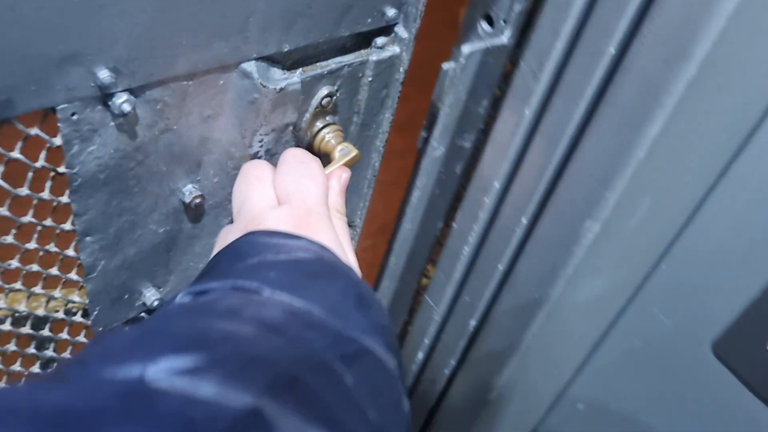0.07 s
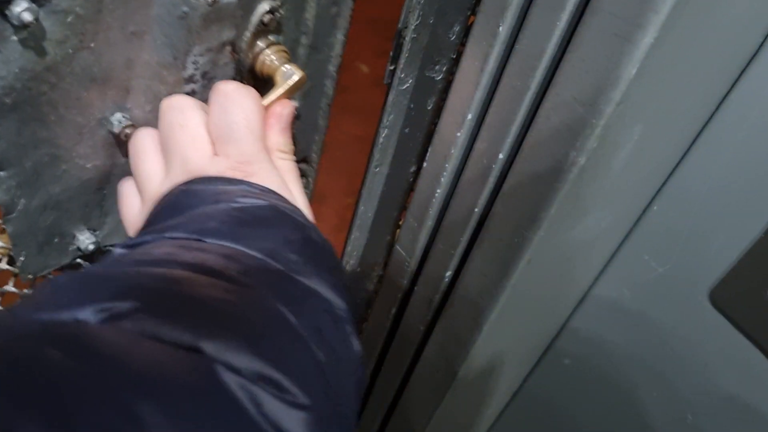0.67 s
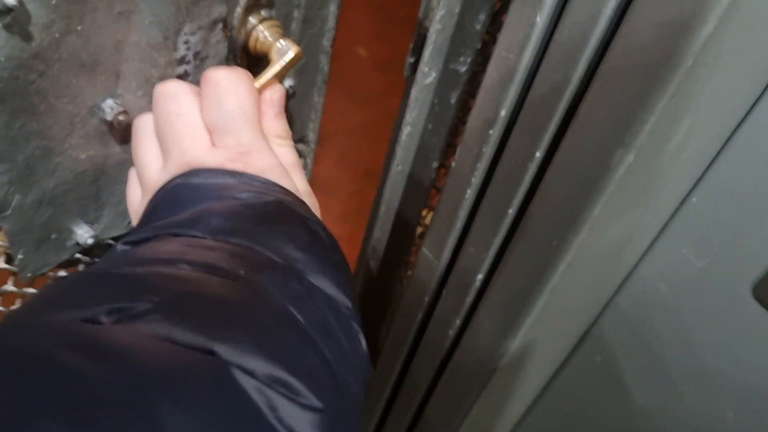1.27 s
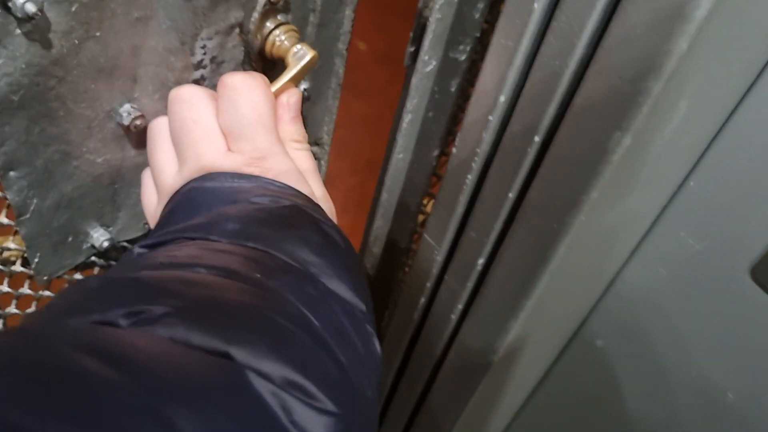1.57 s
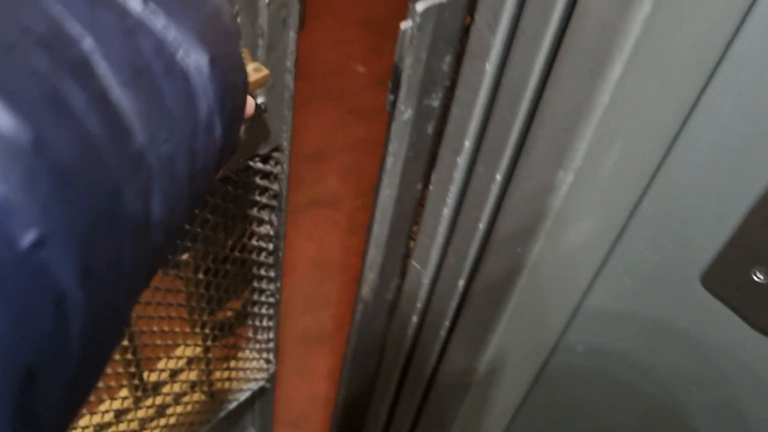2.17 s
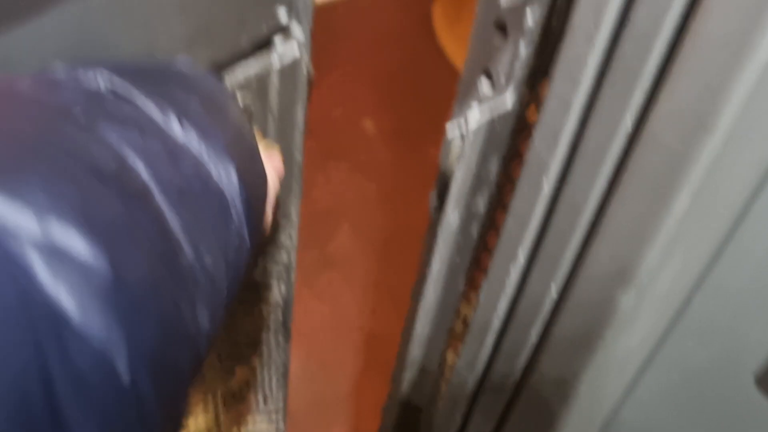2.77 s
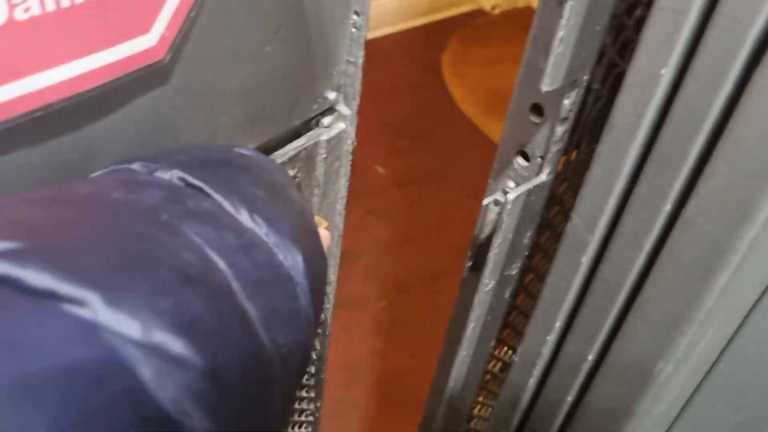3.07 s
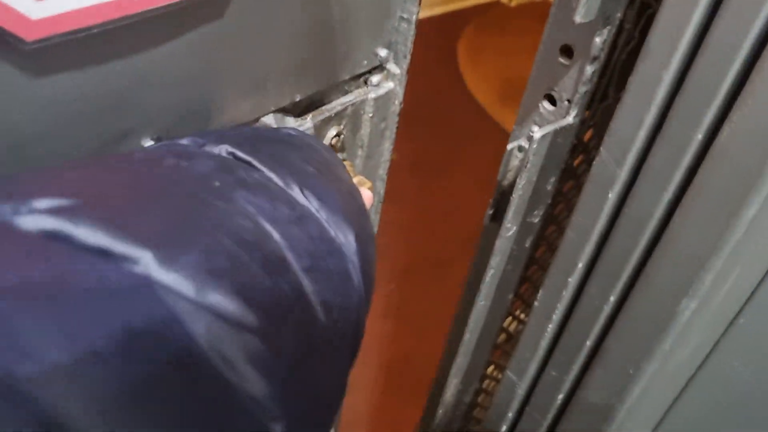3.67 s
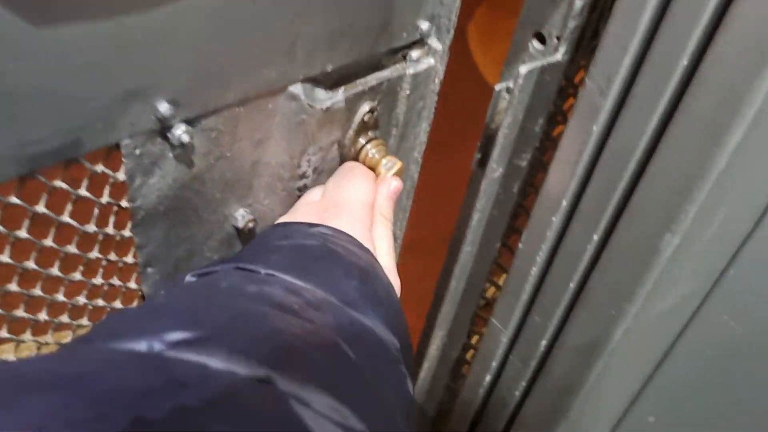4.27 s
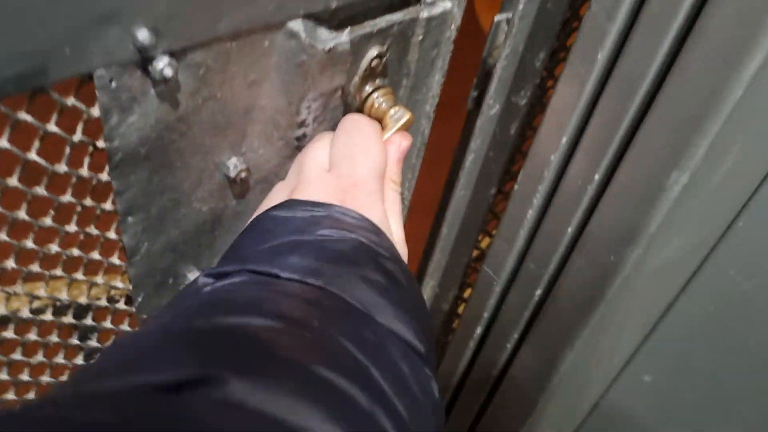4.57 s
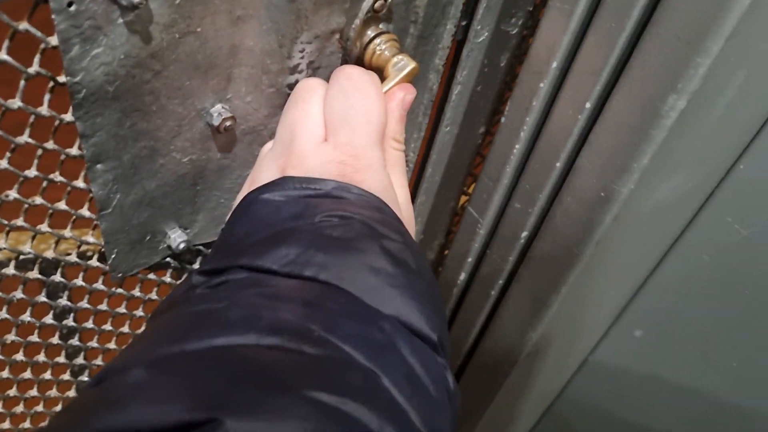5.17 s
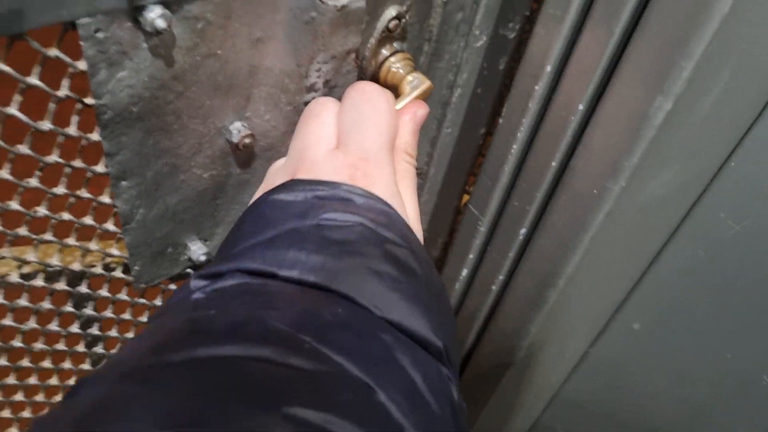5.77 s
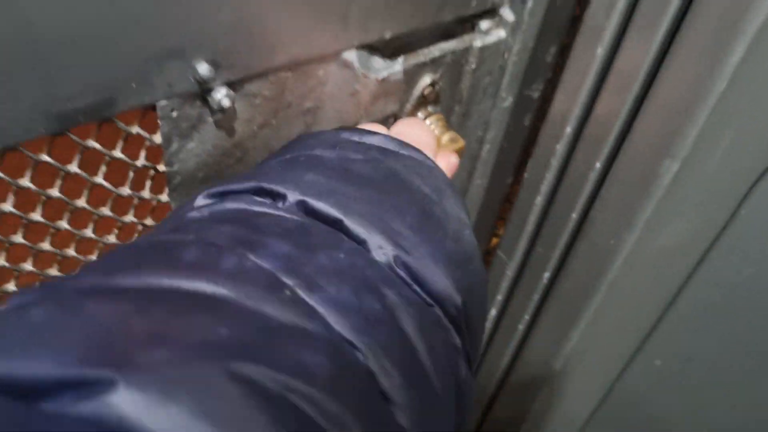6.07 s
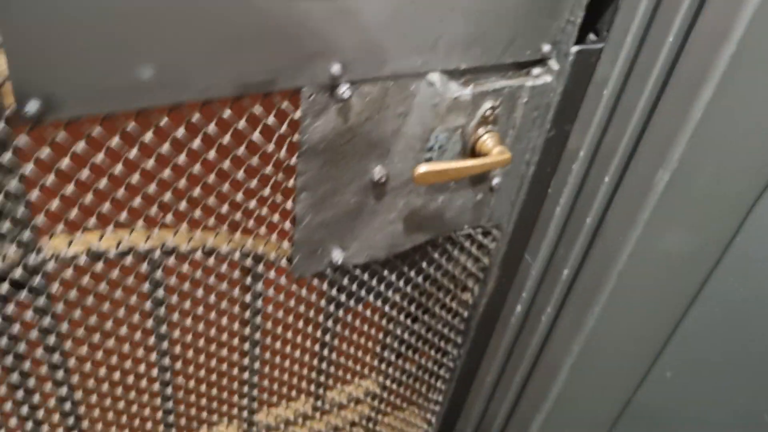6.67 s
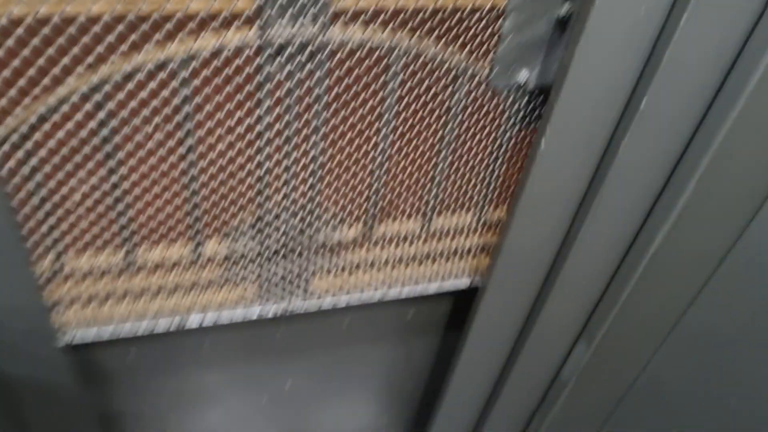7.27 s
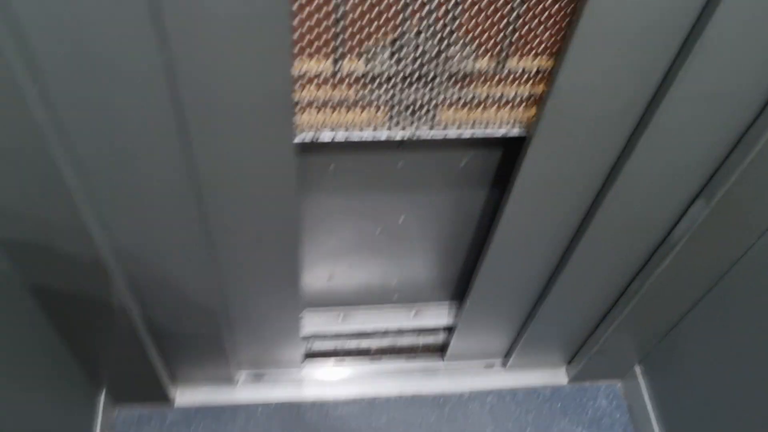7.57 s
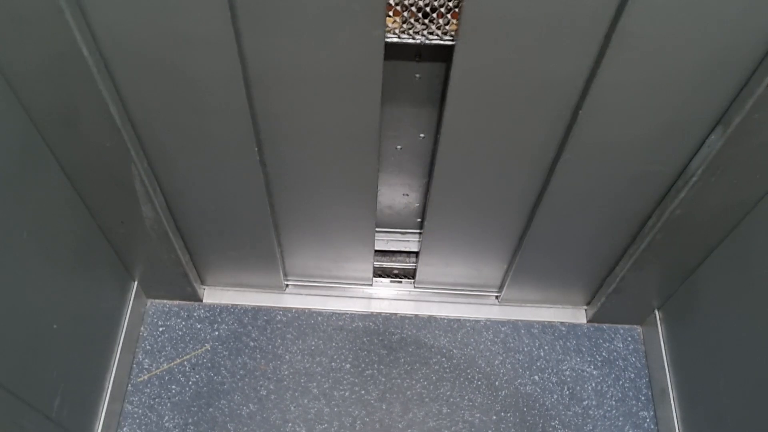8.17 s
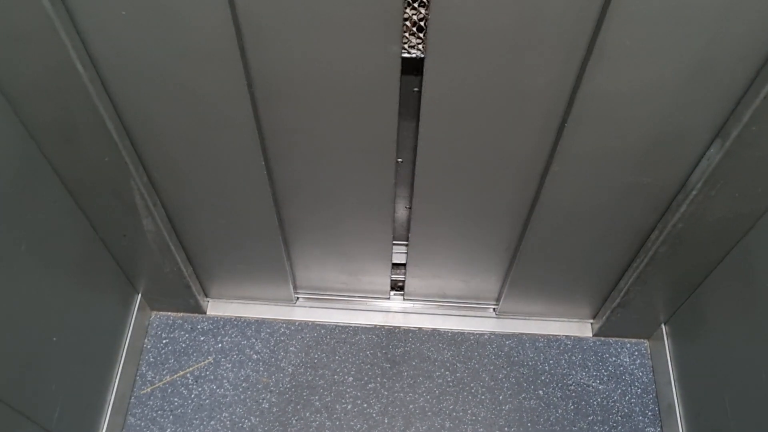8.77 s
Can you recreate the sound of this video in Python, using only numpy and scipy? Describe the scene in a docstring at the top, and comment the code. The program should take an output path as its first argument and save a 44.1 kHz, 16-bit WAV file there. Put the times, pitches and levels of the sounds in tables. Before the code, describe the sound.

A metal gate bangs shut at close range in a cramped elevator cabin, ringing briefly and leaving a deep shudder. Light handle clicks, very faint squeaks and soft jacket rustling follow over a thin electronic whine. A second clunk latches the gate, with more clicks and a louder sleeve swish. Finally the sliding doors roll closed with a padded knock, a low rumble and some scraping.

```python
"""Inside a small old lift, electronics whine faintly. The steel mesh gate slides, slams and sways.
Its brass handle is worked with clicks and thin squeaks, then the gate is pulled into its latch.
A nylon sleeve rustles, and last the cabin's sliding doors rumble shut on their rollers.
The cabin gives each metal blow a short bright ring, the stairwell a long dull tail."""
import sys
import numpy as np
from scipy import signal
from scipy.fft import rfft, irfft, next_fast_len
from scipy.io import wavfile
from scipy.ndimage import uniform_filter1d

SR = 44100
rng = np.random.default_rng(int(sys.argv[2]) if len(sys.argv) > 2 else 0)


def wrap_up_sound(samples):
    """Save the sound to the file named by the first command line argument, as 16-bit audio."""
    columns = np.atleast_2d(samples).T
    # keep every value between -1 and 1, then stretch to whole-number steps
    tamed = np.clip(columns, -1, 1)
    steps = np.round(tamed * 32767).astype(np.int16)
    wavfile.write(sys.argv[1], SR, steps)


N = 389403
TIME = np.arange(N) / SR

# tone colour of small metal parts (handle, door rollers): pitch_hz, level_db
SMALL_METAL_SPECTRUM = [(60, -41), (250, -20.5), (500, -8.5), (1100, 1), (2200, 1.5), (3300, 5), (6000, 4),
                        (10000, -7), (15500, -6.5)]
# notes those parts ring with: pitch_hz, level_db, fade_s
SMALL_METAL_NOTES = [(618.5, -4, 0.095), (1108, -6, 0.13), (1427, -5.5, 0.074), (1670, -18, 0.1),
                     (2030, -6, 0.036), (2391, -9, 0.031), (3124, -9, 0.022), (3820, -19, 0.026),
                     (4750, -2.5, 0.035)]
# tone colour of the door panels: pitch_hz, level_db
PANEL_SPECTRUM = [(76, -44), (130, 3.5), (146, -19.5), (162, 4), (177, 3.5), (249, -2.5), (269, -7),
                  (301, 1), (398, -2.5), (482, -10), (700, -11), (910, -24), (1540, -120)]


def undb(db):
    """Turn decibels into a gain."""
    return 10 ** (np.asarray(db) / 20)


def unit(x):
    """Scale a signal to an average strength (rms) of 1."""
    return x / np.sqrt(np.mean(x ** 2))


def pan(left_db):
    """Gains for the two channels, the left one louder by left_db."""
    return undb(np.array([[left_db], [-left_db]]) / 2)


def read(points, hz):
    """Look up a value between (pitch_hz, value) points, with octaves evenly spaced."""
    pitches, values = np.transpose(points)
    return np.interp(np.log(np.maximum(hz, 1)), np.log(pitches), values)


def colour(x, points, size=8192):
    """Filter a sound so that it follows (pitch_hz, level_db) points."""
    gains = undb(read(points, np.fft.rfftfreq(size, 1 / SR)))
    cepstrum = irfft(np.log(gains))
    # folding this in half keeps the filter from sounding before its input
    cepstrum[1:size // 2] *= 2
    cepstrum[size // 2 + 1:] = 0
    response = irfft(np.exp(rfft(cepstrum)))
    return signal.fftconvolve(np.atleast_2d(x), response[None], axes=1)[:, :x.shape[-1]]


def diffuse(n, spacing_m=.3):
    """Noise from all sides: left and right are alike in the bass, unrelated in the treble."""
    size = next_fast_len(n, True)
    mid, side = rfft(rng.standard_normal((2, size)))
    alike = np.sinc(2 * np.fft.rfftfreq(size, 1 / SR) * spacing_m / 343)  # sound travels 343 m/s
    mid, side = mid * np.sqrt(1 + alike), side * np.sqrt(1 - alike)
    return unit(irfft([mid + side, mid - side], size)[:, :n])


def wander(rate_hz):
    """A random curve of size about 1 that heads for a new value rate_hz times a second."""
    step = int(SR / rate_hz)
    stairs = np.repeat(rng.standard_normal(N // step + 1), step)
    return unit(uniform_filter1d(stairs, step)[:N])


def fade(t, fade_s):
    """Die away by 60 dB every fade_s seconds."""
    return np.exp(-np.log(1000) * t / np.maximum(fade_s, 1e-3))


def swell(peak_s, hold_s, rise_s, fall_s):
    """Grow until peak_s, hold, then fall; rise_s and fall_s are the times for a tenfold change."""
    early, late = np.maximum(peak_s - TIME, 0), np.maximum(TIME - peak_s - hold_s, 0)
    return 10 ** -np.minimum(early / max(rise_s, 1e-3) + late / max(fall_s, 1e-3), 10)


def ring(notes, t):
    """A struck object rings with several fading notes at once."""
    return sum(undb(db) * fade(t, fade_s) * np.sin(2 * np.pi * hz * t) for hz, db, fade_s in notes)


def add(out, start_s, x):
    """Mix a sound in at start_s."""
    i = max(int(start_s * SR), 0)
    out[:, i:i + x.shape[-1]] += x[..., :N - i]


def tone(hz, waver_db, drift_rad):
    """A held note that wavers in level and phase, differently left and right."""
    phase = 2 * np.pi * hz * TIME + drift_rad * np.array([wander(10), wander(6.1)])
    return unit(np.sin(phase) * undb(waver_db * np.array([wander(1.4), wander(13.0)])))


def rough_noise(spectrum, rough_db, rate_hz):
    """Noise whose strength changes from moment to moment, as in rubbing."""
    return unit(colour(diffuse(N) * undb(rough_db * wander(rate_hz)), spectrum))


def metal_hits(hits, spectrum, notes, ring_db, focus_db, left_lag_ms, rough_db, rise_s):
    """Metal on metal: a chatter of tiny bounces makes a crack and sets the part ringing."""
    out, t = np.zeros((2, N)), TIME[:SR // 3]
    response = ring(notes, t)
    response /= np.linalg.norm(response)
    for start_s, db, treble_db, ring_hz, chatter_s, left_db in hits:
        bounces = undb(rough_db * np.repeat(rng.standard_normal(len(t)), SR // 900)[:len(t)])
        force = rng.standard_normal(len(t)) * bounces * fade(t, chatter_s) * (1 - np.exp(-t / rise_s))
        crack = unit(colour(force, spectrum, size=2048))
        ringing = unit(signal.fftconvolve(force, response)[:len(t)])
        hit = crack + undb(ring_db) * ringing
        # the spot that is struck favours one pitch
        hit = colour(hit, [(ring_hz / 1.4, 0), (ring_hz, focus_db), (ring_hz * 1.1, 0)], size=1024)
        # a soft hit has less treble
        top_db = min(treble_db, 0.73 * treble_db)
        hit = colour(hit, [(2500, 0.0017), (7000, treble_db), (13000, top_db)], size=256)[0]
        hit *= undb(db) / hit[:SR // 200].std()  # the first 5 ms set the level
        add(out[:1], start_s + left_lag_ms / 1000, hit * undb(left_db / 2))
        add(out[1:], start_s, hit * undb(-left_db / 2))
    return out


def background(air_db=-59, whine_hz=15687, whine_db=-61):
    """Still air of the building, a faint hum and a thin electronic whine."""
    # tone colour of the air: pitch_hz, level_db
    air_spectrum = [(13, -46), (22, -17), (37, -8.5), (60, 0), (127, -17), (271, -13.5), (302, -7.5),
                    (328, -20.5), (355, -14), (418, -16), (821, -21.5), (1610, -30), (5150, -34),
                    (11000, -43), (14000, -40)]
    # notes of the hum: pitch_hz, level_db
    hum_notes = [(299.5, -72), (400, -79.5)]
    air = undb(air_db) * rough_noise(air_spectrum, rough_db=3.0, rate_hz=5)
    hum = sum(undb(db) * tone(hz, waver_db=-0.5, drift_rad=2.0) for hz, db in hum_notes)
    return air + hum + undb(whine_db) * tone(whine_hz, waver_db=1.0, drift_rad=1.0)


def stairwell(x, build_s=0.02):
    """The stone shaft behind the mesh echoes for a long time, the treble dying first."""
    # how long the echo lasts: pitch_hz, fade_s
    echo_times = [(100, 2.42), (400, 2.22), (1300, 1.88), (2800, 1.61), (5500, 1.04), (9000, 0.68),
                  (11500, 0.66), (15000, 0.57)]
    t = TIME[:2 * SR + SR // 2]
    hz, times, bands = signal.stft(diffuse(len(t)), SR, nperseg=256)
    bands = bands * fade(times, read(echo_times, hz)[:, None])
    tail = signal.istft(bands, SR)[1][:, :len(t)]
    tail *= 1 - np.exp(-t / build_s)
    tail /= np.linalg.norm(tail[0])
    from_left = signal.fftconvolve(x[:1], tail, axes=1)
    from_right = signal.fftconvolve(x[1:], tail[::-1], axes=1)
    return (from_left + from_right)[:, :N] / 2


def cabin(x, echo_db, fade_s):
    """Close steel walls add a crowd of echoes, starting 2 ms after the sound."""
    t = TIME[:SR // 2]
    echoes = diffuse(len(t)) * fade(t, fade_s) * (t > .002)
    echoes /= np.linalg.norm(echoes[0])
    return x + undb(echo_db) * signal.fftconvolve(x, echoes, axes=1)[:, :N]


def handle_squeaks(spread_hz=130, rate_hz=200):
    """The handle's dry brass shaft sticks and slips, making thin, unsteady squeaks."""
    # squeaks under the hand: peak_s, level_db, pitch_hz
    squeaks = [(1.36, -70, 7700), (1.38, -72.5, 5000), (1.6, -67.5, 8950), (1.62, -67.5, 5050),
               (4.45, -68, 5300)]
    wobble_hz = spread_hz * np.array([wander(rate_hz), wander(rate_hz)])
    slip = 2 * np.pi * np.cumsum(wobble_hz, axis=1) / SR
    out = np.zeros((2, N))
    for peak_s, db, hz in squeaks:
        strength = undb(db) * swell(peak_s, hold_s=0.028, rise_s=0.063, fall_s=0.13)
        out += strength * np.sin(2 * np.pi * hz * TIME + slip)
    return out


def gate_guide():
    """The moving gate rubs softly along its guide rail."""
    # moves of the gate: peak_s, hold_s, level_db
    slides = [(0.031, 0.076, -47), (1.57, .12, -59), (2.796, 0.43, -64), (4.453, 0.82, -65)]
    # tone colour of the rail: pitch_hz, level_db
    rail_spectrum = [(200, -21), (500, -9.5), (720, -7), (820, 3), (930, -14.5), (1600, -19.5),
                     (3000, -16.5), (8000, -36)]
    effort = sum(undb(db) * swell(s, hold_s, rise_s=0.22, fall_s=.12) for s, hold_s, db in slides)
    return effort * rough_noise(rail_spectrum, rough_db=0.3, rate_hz=30)


def sleeve():
    """Nylon brushes against itself and the gate in many tiny slips."""
    # strokes of the sleeve: peak_s, hold_s, level_db, rise_s, fall_s
    strokes = [(0.069, 0.046, -45.5, 0.39, 0.046), (1.583, 0.045, -63.5, 0.075, 0.44),
               (2.104, 0, -46, 0.049, 0.22), (3.25, 0.025, -58, 0.17, 0.092),
               (4.527, 0.21, -65.5, 0.28, 0.18), (6.098, 0.061, -34.5, 0.097, 0.064),
               (6.254, 0.45, -52.5, 0.069, 0.12), (6.817, 0, -39, 0.012, 0.072),
               (6.877, 0.64, -47.5, 0.19, 0.33), (7.093, 0.041, -46.5, .004, 0.085),
               (7.67, 0.042, -44, 0.092, 0.12), (7.99, 0.13, -58, 0.22, 0.54)]
    # tone colour of nylon: pitch_hz, level_db
    nylon_spectrum = [(150, -25.5), (500, 2), (1200, 0), (1900, -1.5), (3000, 0), (5300, -2.5), (10000, -6),
                      (15500, -10)]
    effort = sum(undb(db) * swell(s, hold, rise, fall) for s, hold, db, rise, fall in strokes)
    return rough_noise(nylon_spectrum, rough_db=1.0, rate_hz=67) * effort * pan(left_db=-1)


def door_knock(rise_s=0.0032, thud_db=-5, thud_s=0.072):
    """A padded knock of the door drive rings and shakes the panels."""
    # the knock: start_s, level_db
    knocks = [(7.015, -23)]
    # notes of the door: pitch_hz, level_db, fade_s
    door_notes = [(70.8, 9.5, 0.29), (173.3, 4, 0.2), (254, -16, 0.46), (119, -6, 0.096), (300, -39, 0.14)]
    out, t = np.zeros((2, N)), TIME[:SR]
    push = 1 - np.exp(-t / rise_s)
    for start_s, db in knocks:
        thud = undb(thud_db) * unit(colour(diffuse(len(t)), PANEL_SPECTRUM)) * fade(t, thud_s)
        add(out, start_s, undb(db) * push * (ring(door_notes, t) + thud))
    return out


def roller_rattles(gain_db=-9):
    """The rollers and hangers that carry the doors rattle."""
    # rattles: start_s, level_db (before gain_db), treble_db, ring_hz, chatter_s, left_db
    rattles = [(6.481, -49, -27, 1100, .1, -12), (6.819, -28.5, 17, 5470, 0.066, -3),
               (7.097, -42, 15, 5000, 0.098, -11), (7.290, -32.5, -27, 1150, 0.04, -5),
               (7.420, -39.5, -27, 1400, 0.068, -2), (7.651, -30.5, -5.5, 1100, 0.22, -2),
               (7.690, -33.5, -1, 1040, 0.11, -3), (7.836, -42, -25.5, 1350, 0.031, -7),
               (7.876, -55, -10.5, 1400, 0.11, 6), (8.214, -47.5, -20, 1100, .05, 0),
               (8.266, -53, -20, 1150, 0.11, -14)]
    return undb(gain_db) * metal_hits(rattles, SMALL_METAL_SPECTRUM, SMALL_METAL_NOTES, ring_db=-9.5,
                                      focus_db=8, left_lag_ms=.25, rough_db=1.5, rise_s=0.0016)


def sliding_doors():
    """The doors speed up, run and brake; they shake the cabin, drone and scrape along the sill."""
    # gate and doors shudder in their frames: peak_s, hold_s, rumble_db, drone_db
    shudders = [(5.43, 0.042, -33.5, -38), (5.568, 0.07, -34.5, -55), (5.9, 0.099, -34.5, -60),
                (6.017, .01, -28, -36), (6.13, 0.58, -40, -49), (6.513, 0.064, -33.5, -40.5),
                (6.824, 0.023, -30.5, -37.5), (7.126, 0.036, -35, -43), (8.237, 0.1, -42, -45.5),
                (8.551, .04, -46.5, -45.5), (8.658, 0.12, -38, -61)]
    # metal catches on the sill: peak_s, level_db
    catches = [(5.435, -40.5), (6.479, -40.5), (7.293, -41.5), (7.42, -48), (7.686, -40), (7.88, -44.5),
               (8.28, -46)]
    # tone colour of the shaking cabin: pitch_hz, level_db
    rumble_spectrum = [(13, -47), (22, -31), (39, -6.5), (65, 4.5), (83, -2), (113, -19.5), (140, -27),
                       (180, -14), (310, -120)]
    # tone colour of the door track: pitch_hz, level_db
    track_spectrum = [(200, -36.5), (550, 6), (800, 10.5), (950, 6), (1100, 6), (1230, -4), (1380, -6.5),
                      (1650, -4), (2700, -5), (3600, -16), (6000, -39), (14000, -47)]
    speed = swell(peak_s=7.415, hold_s=0.33, rise_s=0.98, fall_s=1.14)
    shake = undb(-28.5) * speed
    drone = undb(-45.5) * speed ** 0.85
    scrape = undb(-48.5) * speed ** 0.93
    for peak_s, hold_s, rumble_db, drone_db in shudders:
        shudder = swell(peak_s, hold_s, rise_s=0.044, fall_s=0.12)
        shake = np.hypot(shake, undb(rumble_db) * shudder)  # noises add by their power
        drone = np.hypot(drone, undb(drone_db) * shudder)
    for peak_s, db in catches:
        scrape = np.hypot(scrape, undb(db) * swell(peak_s, hold_s=0.0027, rise_s=.03, fall_s=0.068))
    rumble = colour(diffuse(N), rumble_spectrum)
    rumble /= np.sqrt(uniform_filter1d(rumble[0] ** 2, size=SR // 12))  # the rolling load is steady
    panels = drone * rough_noise(PANEL_SPECTRUM, rough_db=2, rate_hz=40)
    track = scrape * rough_noise(track_spectrum, rough_db=1.5, rate_hz=69)
    return shake * rumble + (panels + track) * pan(left_db=1.5)


def handle_clicks():
    """The brass handle and its bolt click as they are worked."""
    # clicks: start_s, level_db, treble_db, ring_hz, chatter_s, left_db
    clicks = [(1.003, -47, -14, 2394, 0.016, -2.5), (1.865, -39, -5.5, 4380, 0.051, -4.5),
              (1.93, -32.5, 2, 1195, 0.024, -13), (1.941, -33, -8, 3180, 0.043, 7.5),
              (2.161, -32, -5.5, 1123, 0.014, -8.5), (2.169, -37.5, -13, 1150, 0.024, 7),
              (3.255, -40, -6.5, 3414, 0.034, -10.5), (3.897, -36, -7.5, 3300, 0.041, -8),
              (3.980, -43, -3.5, 1350, 0.031, -4.5), (4.103, -58, -5, 1298, 0.056, -7),
              (4.808, -55.5, -14, 1248, 0.018, -2.5), (5.220, -50.5, -1.5, 1630, 0.15, -2.5),
              (5.425, -50.5, -15.5, 6220, 0.018, -15), (5.861, -32, 0.5, 11900, 0.018, -7.5),
              (5.95, -35.5, -20, 3220, 0.013, -7), (6.217, -32, -9, 2900, 0.042, -4.5),
              (6.337, -29, -4, 3100, 0.019, 1.5), (6.346, -25.5, -5, 1340, 0.023, -4),
              (6.406, -38, -1, 2823, 0.026, -3)]
    return metal_hits(clicks, SMALL_METAL_SPECTRUM, SMALL_METAL_NOTES, ring_db=-13,
                      focus_db=5, left_lag_ms=-.1, rough_db=4, rise_s=0.0011)


def gate_body(frame_db=-10, thud_db=-1, thud_s=0.43, sway_db=2, rise_s=0.002, sway_rise_s=.007):
    """The frame booms, and the whole gate sways on low notes so close together that they throb."""
    # the gate's weight arrives and rocks: start_s, level_db, extra_sway_db
    thumps = [(.266, -11, -1.5), (0.554, -28, -26), (.657, -32.5, -21), (1.072, -53, 10),
              (1.929, -59.5, 0.5), (2.165, -53.5, -5), (5.391, -45.5, 2), (5.701, -21, -4),
              (6.013, -32, -15)]
    # tone colour of the thud: pitch_hz, level_db
    thud_spectrum = [(25, -7), (55, 1), (105, -10), (135, -16), (180, -3), (350, -8.5), (550, -15.5),
                     (900, -18), (2500, -48.5)]
    # notes of the frame: pitch_hz, level_db, fade_s
    frame_notes = [(164.7, -3.5, 1.2), (179.9, 4.5, 0.82), (203.2, -11.5, 2.2), (213, -9, 1.1),
                   (235.2, -3, 0.73), (276, -13.5, 0.91), (329.6, -10, 1.1), (360, 2.5, 0.3),
                   (423, -19.5, 1.3), (477.5, -16, 1)]
    # notes of the swaying gate: pitch_hz, level_db, fade_s
    sway_notes = [(53.7, -4, 1.5), (57.3, -1, 2.1), (69.2, -5.5, 1.7), (52.5, 0.5, 1.2)]
    frame, sway, t = np.zeros((2, N)), np.zeros((2, N)), TIME[:3 * SR]
    push = 1 - np.exp(-t / rise_s)
    boom = undb(frame_db) * ring(frame_notes, t)
    throb = (1 - np.exp(-t / sway_rise_s)) * ring(sway_notes, t)
    for start_s, db, extra_sway_db in thumps:
        thud = undb(thud_db) * unit(colour(diffuse(len(t)), thud_spectrum)) * fade(t, thud_s)
        add(frame, start_s, undb(db) * push * (boom + thud))
        add(sway, start_s, undb(db + sway_db + extra_sway_db) * throb)
    return frame, sway


def gate_clacks():
    """The steel gate strikes its frame and lock."""
    # blows: start_s, level_db, treble_db, ring_hz, chatter_s, left_db
    clacks = [(.203, -36.5, 4, 1580, 0.21, -7.5), (.234, -20, -8, 1310, 0.029, 11),
              (.240, -14.5, -3.5, 1310, 0.016, -10.5), (.249, -22, -6, 6060, 0.054, 23),
              (.2595, -14, -1.5, 6400, 0.047, -9), (.270, -24.5, 4, 1309, 0.051, 3),
              (5.344, -50, -17, 1600, .1, 5), (5.375, -41.5, -25, 1490, 0.024, -5),
              (5.418, -34, -35, 1390, 0.033, 1.5), (5.458, -58, -33, 810, 0.068, 0),
              (5.661, -28.5, -24.5, 1390, 0.021, -5.5), (5.693, -20.5, -2.5, 1420, 0.021, -7.5),
              (5.775, -36.5, -14, 1360, .03, -5), (5.807, -37.5, -6, 1410, .03, -7),
              (6.007, -35, -21, 1320, 0.028, -3)]
    # tone colour of the steel: pitch_hz, level_db
    steel_spectrum = [(60, -40), (200, -19), (400, -10), (750, -8), (1300, -0.5), (1800, -7.5), (3000, -9),
                      (4200, -14), (6200, -8.5), (9500, -11), (15500, -22)]
    # notes of the lock: pitch_hz, level_db, fade_s
    lock_notes = [(605, -8, .06), (1008, 0, 0.13), (1245, -3, 0.018), (1323, -4, 0.028),
                  (2631, -8.5, 0.073), (5630, -17.5, 0.015), (7530, -13.5, .02)]
    return metal_hits(clacks, steel_spectrum, lock_notes, ring_db=-11.0,
                      focus_db=5.5, left_lag_ms=.25, rough_db=-1.5, rise_s=0.00049)


def scene():
    """All the sounds in the cabin, with the stairwell behind."""
    clacks, clicks, rattles = gate_clacks(), handle_clicks(), roller_rattles()
    metal = cabin(clacks, echo_db=-2.5, fade_s=0.17)
    metal += cabin(clicks, echo_db=-3.0, fade_s=0.2)
    metal += cabin(rattles, echo_db=2, fade_s=0.13)
    frame, sway = gate_body()
    tail = stairwell(undb(-7.5) * clacks + undb(-13.0) * (clicks + rattles) + undb(-11.5) * frame)
    rubbing = sleeve() + gate_guide()
    doors = sliding_doors() + door_knock()
    return metal + frame + sway + tail + rubbing + doors + background() + handle_squeaks()


def record(dry, top_hz=15760):
    """The microphone colours the treble; the recorder clips at full scale and cuts the very top."""
    # the microphone's treble dip and the lift above it: pitch_hz, level_db
    microphone = [(9800, 0), (11200, -3), (12600, 3.5)]
    wave = np.clip(colour(dry, microphone, size=256), -1, 1)
    return signal.sosfilt(signal.ellip(12, .2, 70, top_hz, fs=SR, output="sos"), wave)


dry = scene()
out = record(dry)
wrap_up_sound(out)
```